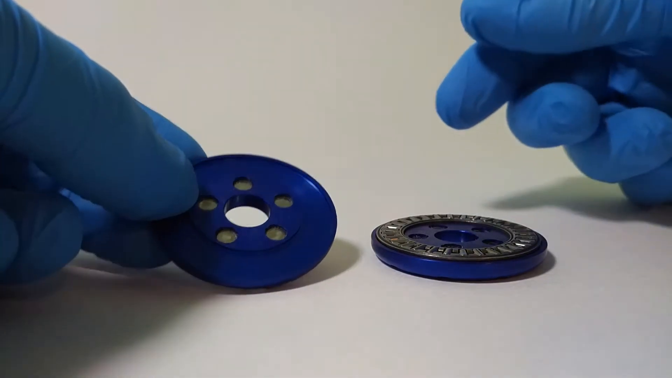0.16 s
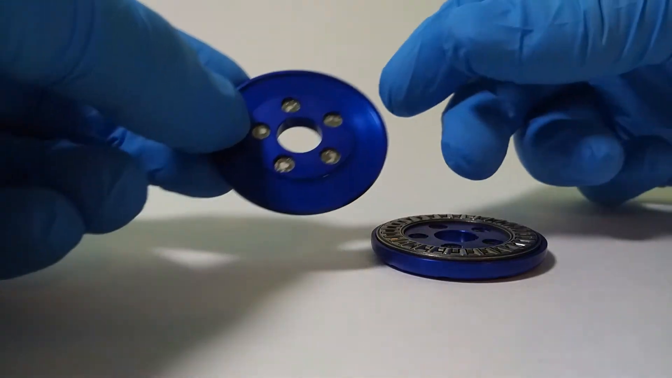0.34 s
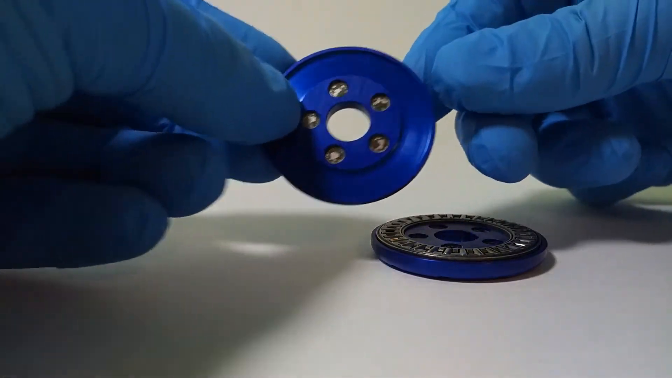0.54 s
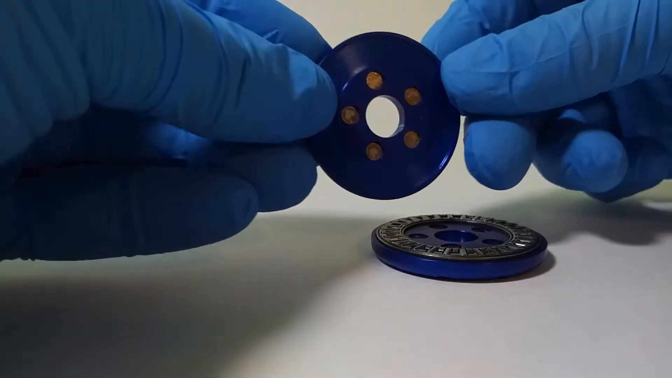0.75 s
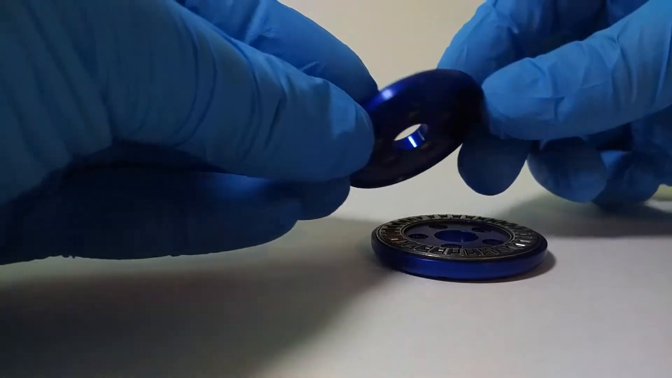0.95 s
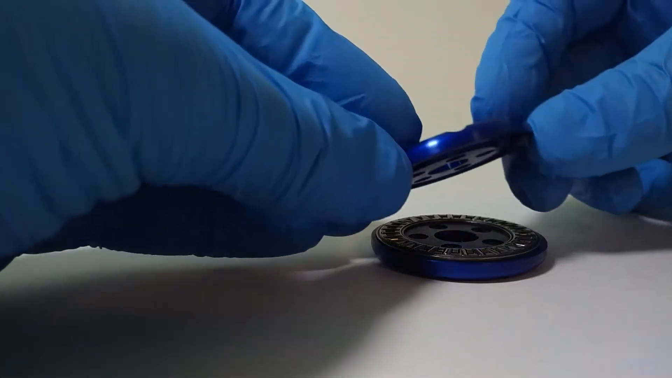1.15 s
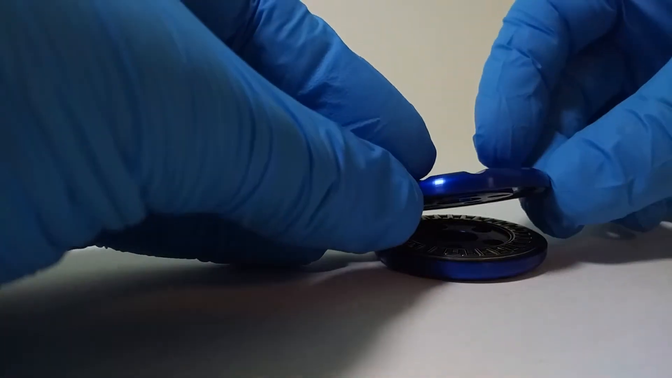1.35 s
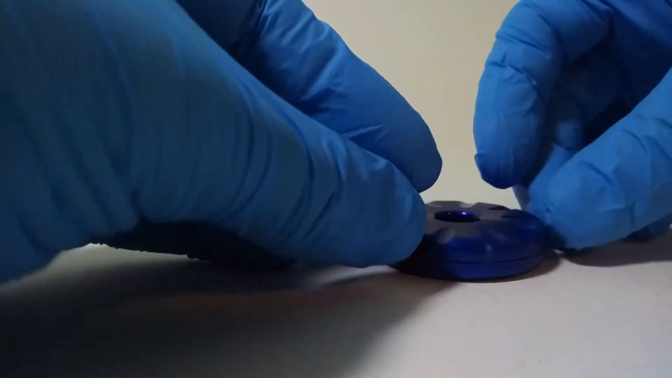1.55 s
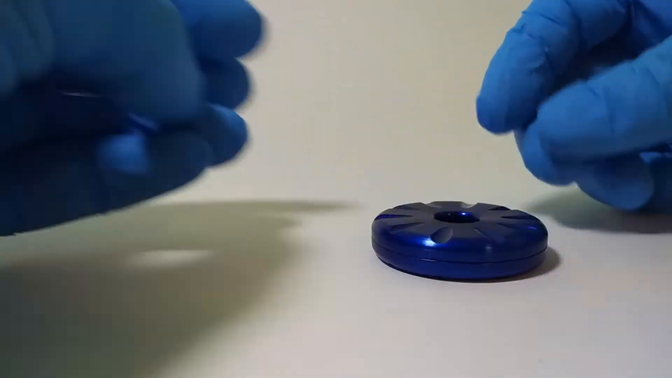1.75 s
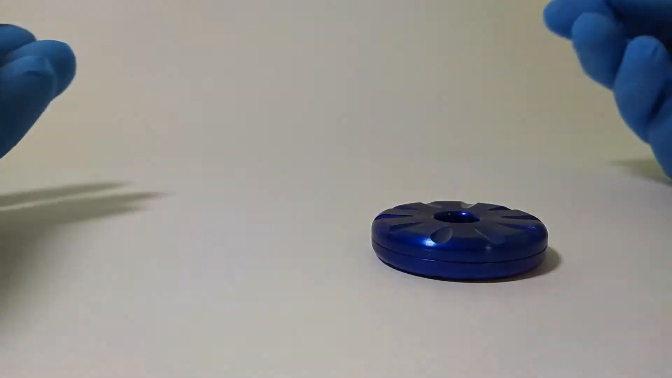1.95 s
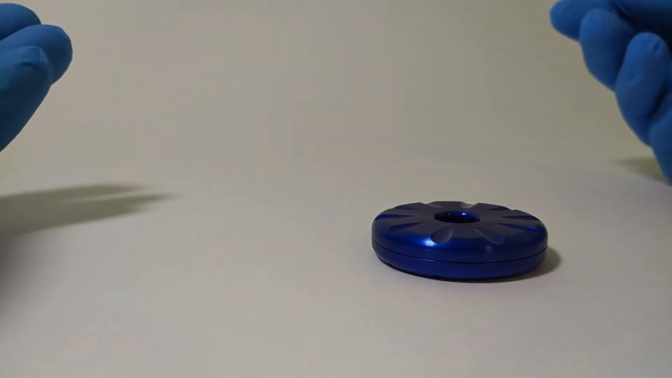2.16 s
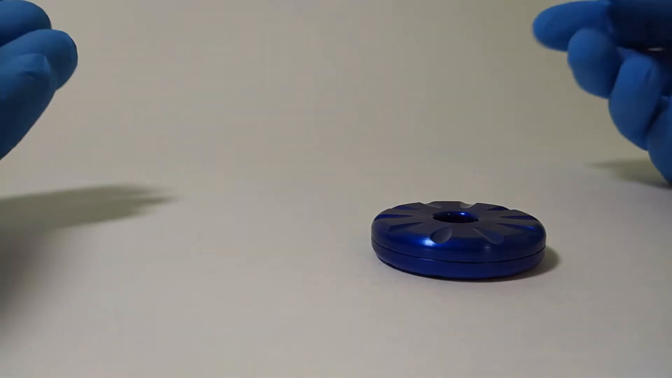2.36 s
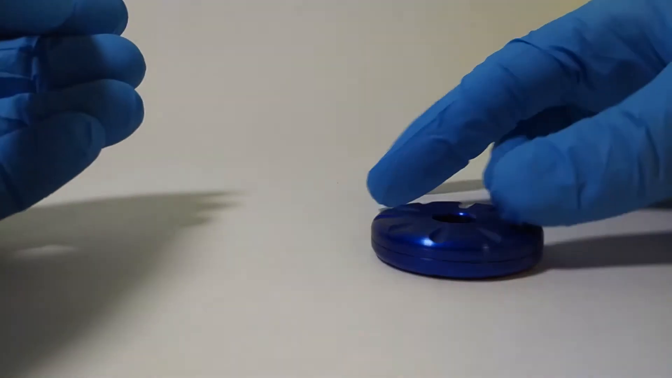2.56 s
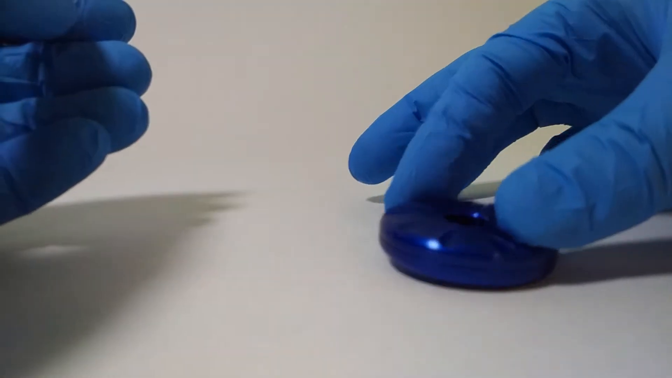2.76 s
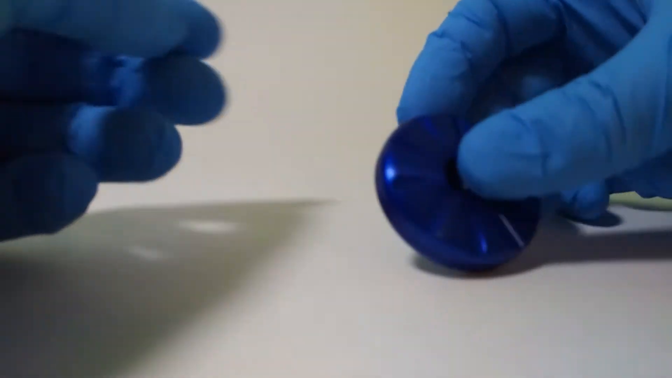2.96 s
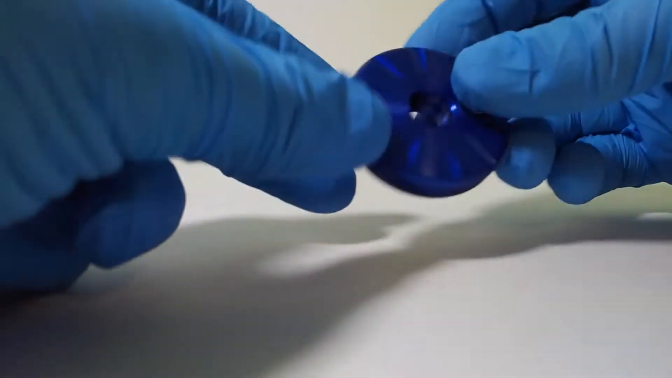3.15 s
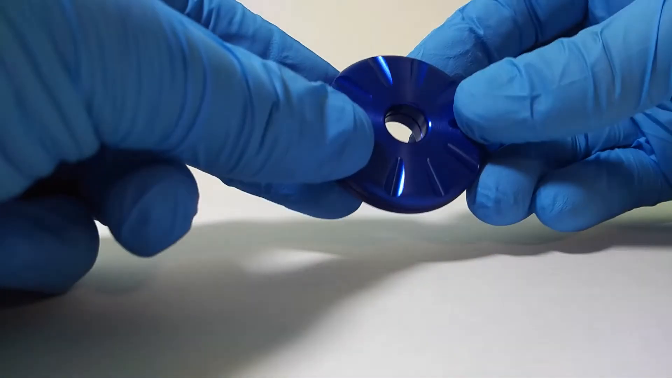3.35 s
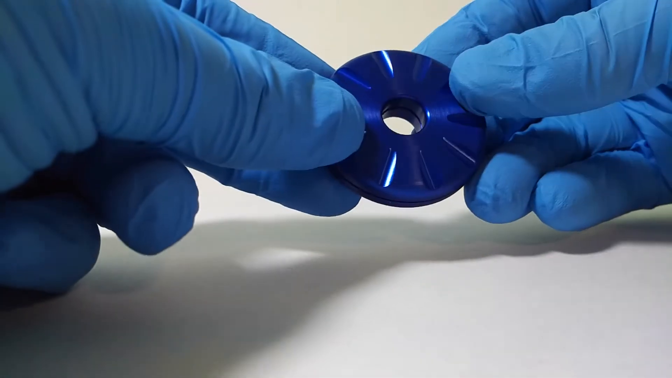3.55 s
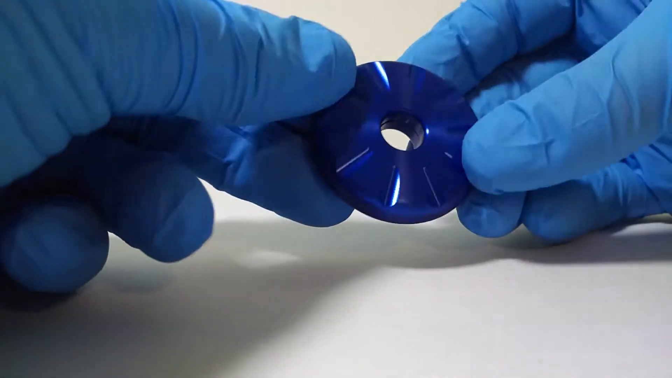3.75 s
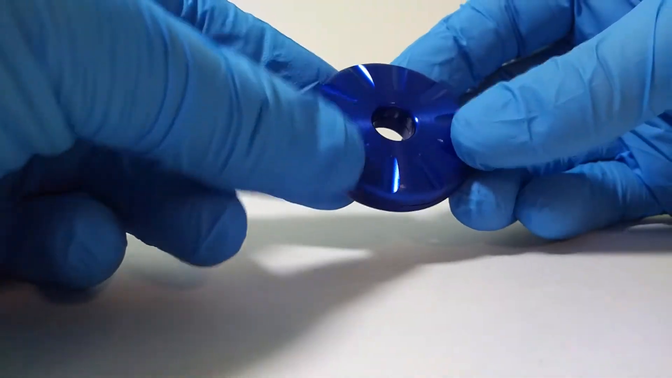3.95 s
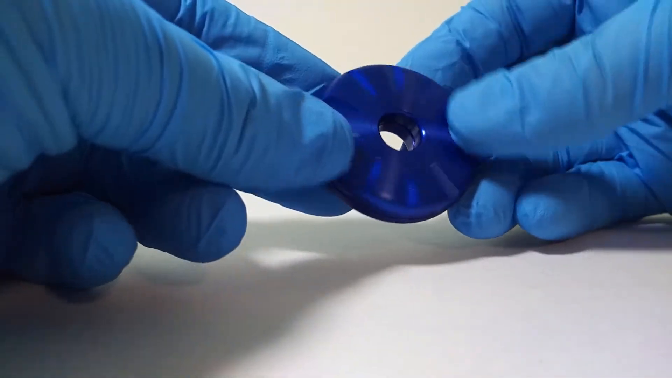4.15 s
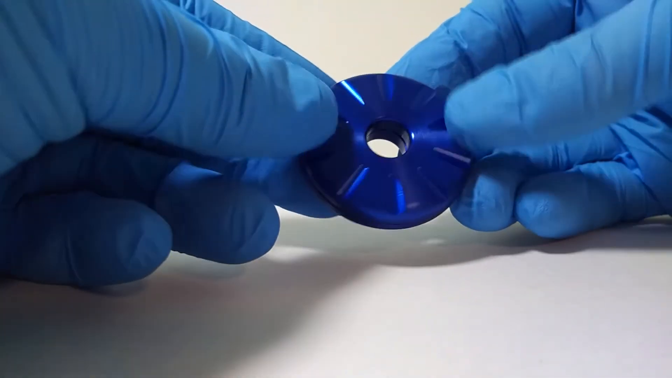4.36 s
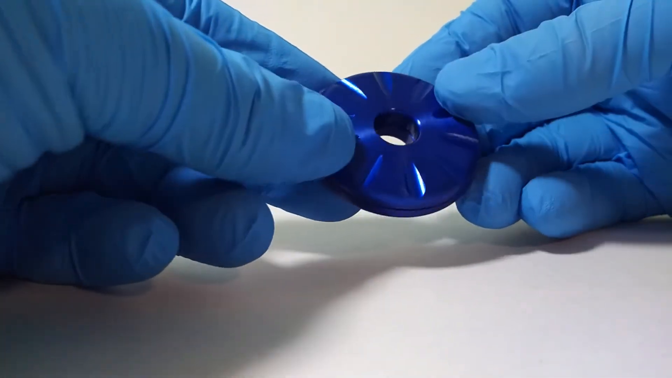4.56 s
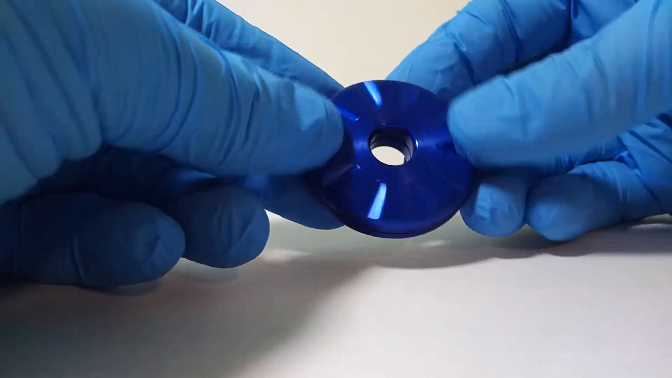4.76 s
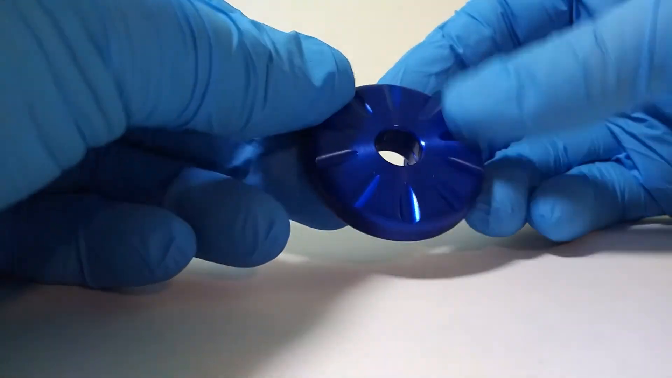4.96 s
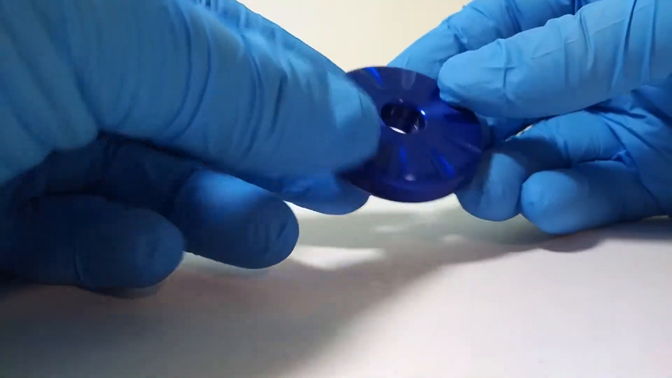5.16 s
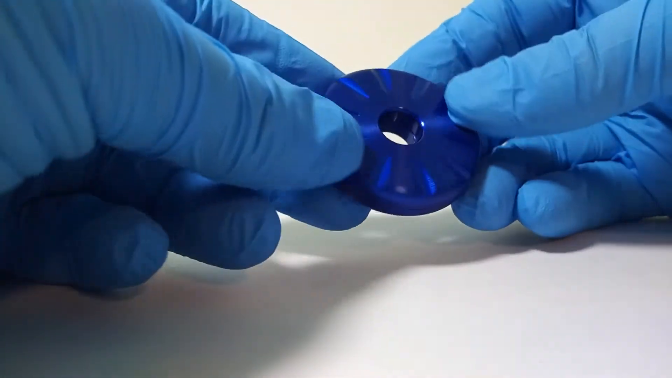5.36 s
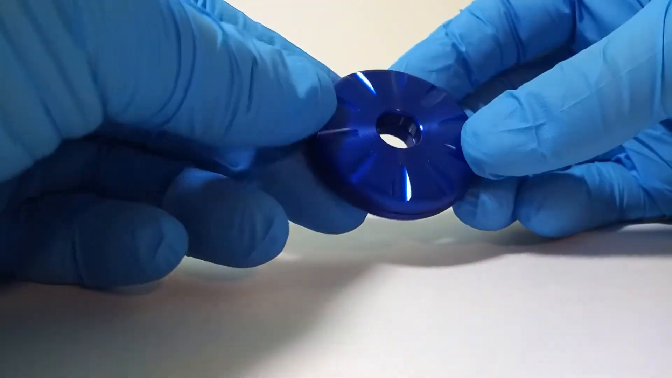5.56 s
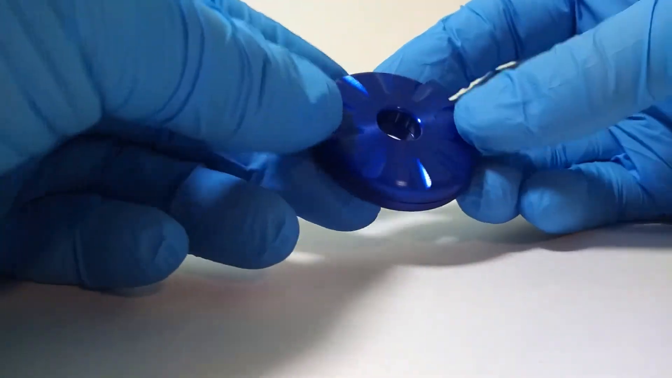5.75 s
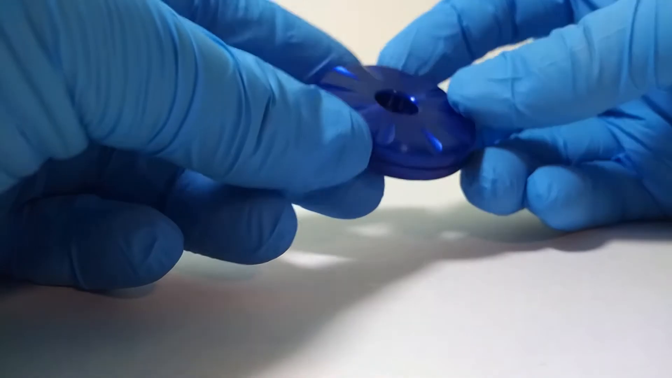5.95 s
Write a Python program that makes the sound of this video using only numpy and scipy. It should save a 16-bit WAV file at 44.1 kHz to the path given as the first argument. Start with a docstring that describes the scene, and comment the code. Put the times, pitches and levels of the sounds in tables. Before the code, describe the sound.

Everything happens close to the microphone in a small, live room with a faint hiss. For the first second and a half, rubber gloves rustle quietly, with light scuffs and small ticks as a metal shell is lifted. At about 1.6 seconds, the two magnetic shells of a fidget toy snap together: a sharp crack with a very quick chatter, a short bright ring and a thud from the wooden desk. This is by far the loudest sound, and it echoes briefly. From 2.5 to 3.3 seconds come soft glove rubs, taps, low bumps and a hollow scuff as the toy is dragged off the desk. Four twists follow at about 3.8, 4.3, 4.9 and 5.5 seconds, each a quick scrape rushing into a crisp metallic clack with a slight low jolt; the third is strongest. Faint sliding and fingertip ticks fill the gaps, ending around 6 seconds.

```python
"""Rubber gloves rustle and scuff over a desk, pick up one metal shell of a magnetic fidget toy
and let it snap onto its twin: a crack, a short metallic ring and a thud from the wood.
The toy is dragged off the desk and twisted four times: the shells scrape, clack into the next
magnet notch and jolt the desk. A small live room, heard from close by through two microphone
ports, the left one ringing in the treble."""
import sys
import numpy as np
from scipy import signal
from scipy.fft import rfft, irfft
from scipy.io import wavfile

SR = 44100
rng = np.random.default_rng(int(sys.argv[2]) if len(sys.argv) > 2 else 0)


def wav_record(signal):
    """Record a signal, one row per channel, as 16-bit PCM in the file named by sys.argv[1]."""
    frames = np.transpose(np.atleast_2d(signal))
    bounded = np.clip(frames, -1, 1)
    # unit amplitude maps onto the largest positive 16-bit level
    quanta = np.round(bounded * 32767).astype(np.int16)
    wavfile.write(sys.argv[1], SR, quanta)


N = 264908
TIME = np.arange(N) / SR

# Twists from notch to notch; levels are relative. Each row: hardest clack in seconds, scrape in dB,
# run-up in seconds, clack in dB, gap between clacks in seconds, note of the gripped shell in Hz,
# then ring, knock, creep and jolt in dB.
TWISTS = [(3.803, -25.5, 0.0083, -20, 0.0034, 5090, -4.5, -17, -46.5, -39),
          (4.2894, -29, 0.014, -21, 0.0021, 5450, -3, -19, -49.5, -32.5),
          (4.901, -21, 0.0085, -13, 0.00377, 4510, -6, -6, -44.5, -37.5),
          (5.5417, -25, 0.0098, -18.5, 0.00503, 4500, -18.5, -5, -50, -36.5)]
# Tone of metal sliding on metal. Each row: frequency in Hz, relative level in dB.
METAL_SPECTRUM = [(100, -14), (900, -29.5), (1500, -10), (2100, -17), (3200, -13.5), (4300, -4),
                  (5600, 1.5), (6600, 0.5), (8000, -11), (10500, -17.5), (13500, -16), (16000, -53)]
# Tone of rubbing gloves. Each row: frequency in Hz, relative level in dB.
RUBBER_SPECTRUM = [(100, -3), (900, -7), (1800, -0.5), (3000, -1), (4500, 1.5), (7000, 0.5), (10000, -4),
                   (15000, -8)]


def amp(db):
    """Decibels to gain."""
    return 10 ** (np.asarray(db) / 20)


def pan(left_minus_right_db):
    """Gains of the left and right port."""
    return amp([[left_minus_right_db / 2], [-left_minus_right_db / 2]])


def at_hz(points, hz):
    """Read (Hz, value) points on a log-frequency axis."""
    point_hz, values = np.transpose(points)
    return np.interp(np.log(np.maximum(hz, 1)), np.log(point_hz), values)


def add(track, start_s, sound):
    """Mix a sound into a track."""
    i = int(start_s * SR)
    track[..., i:i + sound.shape[-1]] += sound[..., :N - i]


def convolve(x, response):
    """Pass a sound through an impulse response."""
    return signal.fftconvolve(np.atleast_2d(x), np.atleast_2d(response), axes=-1)[:, :N]


def colour(x, spectrum, size=4096):
    """Minimum-phase filter with the given spectrum; white noise keeps its power."""
    gains = amp(at_hz(spectrum, np.fft.rfftfreq(size, 1 / SR)))
    cepstrum = irfft(np.log(gains))
    cepstrum[1:size // 2] *= 2
    cepstrum[size // 2 + 1:] = 0
    response = irfft(np.exp(rfft(cepstrum)))
    return convolve(x, response / np.linalg.norm(response))


def resonate(x, hz, width_hz):
    """One resonance, gain 1 at its centre."""
    return signal.lfilter(*signal.iirpeak(hz, hz / width_hz, fs=SR), x)


def fade(t, t60):
    """Exponential decay, 60 dB down after t60 seconds."""
    return np.exp(-np.log(1000) * t / t60)


def surge(t, rise_s, fall_s):
    """Exponential growth up to t = 0, exponential decay after it."""
    return np.exp(np.minimum(t / rise_s, -t / fall_s))


def stroke(crest_s, db, length_s, shape=1.2):
    """Speed of a slide that swells and dies away; shape 1 is pointed, 2 is round."""
    return amp(db) * np.exp(-np.abs(2 * (TIME - crest_s) / length_s) ** shape)


def diffuse(size):
    """Stereo noise from all sides: alike at both ports in the bass, unrelated in the treble."""
    mid, side = rfft(rng.standard_normal((2, size)))
    alike = .75 / (1 + (np.fft.rfftfreq(size, 1 / SR) / 700) ** 4)
    mid = mid * np.sqrt((1 + alike) / 2)
    side = side * np.sqrt((1 - alike) / 2)
    return irfft(np.array([mid + side, mid - side]), size)


def burst(t60, size=8192):
    """The short noisy crack of one contact, scattered to both ports."""
    return diffuse(size) * fade(TIME[:size], t60)


def grit(spread_db, slip_samples=24):
    """Friction: dense micro-slips of unequal size, scattered to both ports; rms 1."""
    noise = diffuse(N)
    slip_db = spread_db * rng.standard_normal(N // slip_samples + 1)
    slips = noise * amp(np.repeat(slip_db, slip_samples)[:N])
    return slips / slips.std()


def catches(spread_db, every_s):
    """Uneven gain of a surface that catches and lets go."""
    times = np.arange(0, TIME[-1], every_s)
    grip = rng.standard_normal(N // 100)[:len(times)]
    return amp(spread_db * np.interp(TIME, times, grip))


def background(air_db=-60):
    """Low room rumble, hiss, a faint hum and a thin electrical whine."""
    # Room tone. Each row: frequency in Hz, relative level in dB.
    air_spectrum = [(20, -97.5), (55, -84), (90, -85), (160, -92), (400, -99), (650, -95), (820, -100),
                    (1400, -99), (2500, -104), (6000, -106), (15500, -104)]
    # Hum and whine. Each row: frequency in Hz, level in dB.
    tones = [(720, -73), (12349, -77), (13038, -71)]
    whine = sum(amp(db) * np.sin(2 * np.pi * hz * TIME) for hz, db in tones)
    return amp(air_db) * colour(diffuse(N), air_spectrum) + whine


def gloves(gain_db=6):
    """Crinkling rubber brushes rubber and metal, now nearer one port, now the other."""
    # Glove strokes. Each row: crest in seconds, relative level in dB, length in seconds,
    # left minus right in dB.
    rubs = [(0.01, -67, 0.054, -4), (0.2, -65.5, 0.22, 0), (0.369, -50.5, 0.074, 4.5),
            (0.654, -56.5, 0.094, 4), (.78, -65.5, 0.048, 0), (0.883, -64.5, .09, 3.5),
            (1.163, -66.5, 0.51, 0.5), (1.952, -55.5, 0.19, -1.5), (2.482, -50, 0.054, 4.5),
            (2.612, -54, 0.19, -1.5), (2.837, -52, 0.047, -2.5), (3.016, -49.5, 0.13, 2),
            (3.25, -60.5, 0.09, 1)]
    speed = sum(stroke(s, db, length_s) * pan(pan_db) for s, db, length_s, pan_db in rubs)
    crinkle = catches(spread_db=1.5, every_s=.005)
    return amp(gain_db) * colour(speed * crinkle * grit(spread_db=1.5), RUBBER_SPECTRUM)


def desk_scuffs(gain_db=-2):
    """The toy's rim or a hand stutters over the desk top, which answers with a hollow scuff."""
    # Drags over the desk. Each row: crest in seconds, relative level in dB, length in seconds.
    drags = [(0.01, -51, 0.076), (.205, -48, 0.058), (1.529, -45, 0.028), (1.636, -34, 0.054),
             (2.612, -54.5, 0.19), (2.87, -48.5, 0.14), (3.006, -33, .08), (5.986, -59.5, 0.66)]
    # Tone of the scuff. Each row: frequency in Hz, relative level in dB.
    scuff_spectrum = [(40, -15.5), (110, -0.5), (200, -3.5), (320, -6), (460, -3.5), (630, -5), (820, -14),
                      (1100, -11.5), (1600, -18), (3000, -22), (8000, -44)]
    # Hollow notes of the desk top. Each row: frequency in Hz, width in Hz, gain in dB.
    hollow_notes = [(377, 19, -9.5), (483, 24, 2), (630, 55, -6.5)]
    speed = sum(stroke(*row) for row in drags)
    stutter = catches(spread_db=2.5, every_s=.012)
    scuff = colour(speed * stutter * diffuse(N), scuff_spectrum)
    hollow = sum(amp(db) * resonate(scuff, hz, width) for hz, width, db in hollow_notes)
    return amp(gain_db) * (scuff + hollow)


def ticks(gain_db=3):
    """Fingertips and rims make damped little contacts, each with one broad resonance."""
    # Light touches. Each row: start in seconds, relative peak level in dB, centre in Hz.
    touches = [(0.54, -48, 5800), (0.707, -45, 5500), (0.848, -52, 5100), (1.147, -41, 1540),
               (1.169, -41, 1270), (1.274, -51.5, 1770), (2.508, -35, 920), (2.596, -34, 2340),
               (3.293, -39, 5430), (4.013, -45, 2470), (4.243, -46, 1123), (4.588, -47.5, 5980),
               (4.78, -45.5, 5280), (4.841, -41, 5930), (5.176, -45, 5950), (5.197, -41.5, 5900),
               (5.268, -46, 990), (5.765, -59, 5800)]
    out = np.zeros((2, N))
    for s, db, hz in touches:
        width_hz = 1700 + .34 * hz
        tick = resonate(resonate(burst(t60=.016), hz, width_hz), hz, width_hz)
        add(out, s, amp(db + gain_db) * tick / np.abs(tick).max())
    return out


def snap(thud_db=-12, desk_db=-3):
    """Each blow cracks, rings the shells and pushes the desk; returns the metal and the wood."""
    # The shells touch twice, slam together and chatter on the desk. Each row: start in seconds,
    # then relative levels in dB of the crack, the shells' ring and the push on the desk.
    blows = [(1.5135, -43, -19.5, -32.5), (1.5475, -41, -31.5, -25.5), (1.6276, -2.5, -4.5, -20.5),
             (1.6329, -6, -2, 0), (1.6347, -8.5, -7, -6), (1.6383, -3.5, 6.5, -5.5),
             (1.6428, -13, -8.5, -2), (1.6459, -10, -14.5, 1), (1.6497, -2.5, -9, -4.5),
             (1.663, -44, -61, -1.5), (1.675, -25.5, -15, -0.5)]
    # Broad, short resonances: pressed together by the magnets, the shells damp each other.
    # Each row: frequency in Hz, width in Hz, gain in dB.
    shell_modes = [(4900, 900, 0), (5690, 1300, 1), (10980, 1400, 5.5)]
    # Ring of the whole desk top. Each row: frequency in Hz, relative level in dB, t60 in seconds.
    desk_modes = [(60.8, -32.5, 0.44), (89.3, -33, .8), (113, -32.5, 0.51), (163.4, -33, 0.77),
                  (203.8, -14, 0.16), (244.3, -32.5, 0.3), (273.3, -35, 0.23), (333, -31.5, 0.11),
                  (498, -44, 1), (615, -30, 0.33), (915, -29, 0.29), (1270, -34, 0.085), (1452, -28, 0.28),
                  (1685, -37.5, 0.34)]
    # Tones of the metal crack and the wooden thud. Each row: frequency in Hz, relative level in dB.
    crack_spectrum = [(100, 1), (600, 5), (1500, 11.5), (2100, 1), (3200, 4.5), (5000, -2), (7000, 0.5),
                      (9000, -4), (12000, -6), (16000, -17)]
    thud_spectrum = [(25, -29), (50, 7), (110, -5), (250, 0), (400, -5), (620, -4), (780, -8.5),
                     (1000, -11.5), (1500, -11.5), (2300, -14), (4000, -21), (10000, -50.5)]
    cracks, contacts, thuds = np.zeros((3, 2, N))
    pushes = np.zeros(N)
    for s, crack_db, ring_db, push_db in blows:
        add(cracks, s, amp(crack_db) * burst(t60=.013))
        add(contacts, s, amp(ring_db) * burst(t60=.0076))
        add(thuds, s, amp(push_db) * burst(t60=.05))
        add(pushes, s, amp([push_db]))
    shell_ring = sum(amp(db) * resonate(resonate(contacts, hz, width), hz, width)
                     for hz, width, db in shell_modes)
    t = TIME[:SR]
    desk_ring = sum(amp(db) * np.sin(2 * np.pi * hz * t) * fade(t, t60) for hz, db, t60 in desk_modes)
    metal = .5 * colour(cracks, crack_spectrum) + shell_ring
    wood = amp(thud_db) * colour(thuds, thud_spectrum) + amp(desk_db) * convolve(pushes, desk_ring)
    return metal, wood


def desk_jolts(gain_db=-1, stiffen=.49, relax_s=.004):
    """Soft pushes make the desk swing for a few cycles, faster while the hand still presses."""
    # Hands bump the desk. Each row: start in seconds, relative level in dB, settled pitch in Hz,
    # time to the crest in seconds.
    bumps = [(2.58, -40, 62, 0.028), (2.735, -36, 57, 0.013), (2.842, -39, 62.4, 0.011),
             (3.016, -33, 52, 0.021), (3.024, -31.5, 201, 0.016), (3.221, -50.5, 57.6, 0.069),
             (4.059, -47.5, 59, 0.03)]
    # The jerk of each twist reaches the desk through the hands, a moment later.
    jerks = [(s + .0035, db, 61.6, .017) for s, *_, db in TWISTS]
    out, t = np.zeros(N), TIME[:SR // 2]
    for s, db, hz, crest_s in bumps + jerks:
        swell = (t / crest_s * np.exp(1 - t / crest_s)) ** 2
        pitch_hz = hz * (1 + stiffen * np.exp(-t / relax_s))
        cycles = np.cumsum(pitch_hz) / SR
        add(out, s, amp(db + gain_db) * swell * np.sin(2 * np.pi * cycles))
    return out


def creep(metal_db=-5, rubber_db=-10):
    """Metal and rubber slide faintly around each twist and with each new grip."""
    # The shells shift in the fingers. Each row: crest in seconds, relative level in dB,
    # length in seconds.
    regrips = [(4.007, -51, 0.052), (4.085, -43.5, 0.023), (4.156, -54, 0.01), (4.504, -55.5, .08),
               (5.238, -50, 0.042), (5.831, -45.5, 0.096)]
    speed = sum(stroke(*row) for row in regrips)
    speed += sum(amp(db) * surge(TIME - s, rise_s=.068, fall_s=.12) for s, *_, db, _ in TWISTS)
    metal = colour(speed * grit(spread_db=3), METAL_SPECTRUM)
    rubber = colour(speed * grit(spread_db=3), RUBBER_SPECTRUM)
    return amp(metal_db) * metal + amp(rubber_db) * rubber


def rattle(t, gap_s, slip_s=.00018, step_db=9.5):
    """Five very short slips grow towards the hardest at t = 0, then rebound ever more weakly."""
    envelope = 0
    for k in range(-2, 3):
        distance = np.minimum(np.abs(t - k * gap_s) / slip_s, 10)
        envelope += amp(-step_db * abs(k)) * np.exp(-.5 * distance ** 2)
    return envelope


def twists(overshoot_s=.0018, clack_gain_db=4, ring_gain_db=10, cavity_hz=1780):
    """The magnets speed a scrape up into hard clacks; the grip sets the note the shell rings with."""
    friction = grit(spread_db=3)
    out = 0
    for s, scrape_db, rise_s, clack_db, gap_s, ring_hz, ring_db, knock_db, _, _ in TWISTS:
        scrape = amp(scrape_db) * surge(TIME - s - overshoot_s, rise_s, fall_s=.0059)
        clacks = amp(clack_db + clack_gain_db) * rattle(TIME - s, gap_s)
        force = (scrape + clacks) * friction + 1e-18  # the offset keeps the filters from underflowing
        ring = amp(ring_db + ring_gain_db) * resonate(force, ring_hz, width_hz=260)
        knock = amp(knock_db) * resonate(force, cavity_hz, width_hz=210)  # hollow between the shells
        out += force + ring + knock
    return colour(out, METAL_SPECTRUM)


def room_response(build_s=.01, size=40960):
    """Diffuse room tail of unit energy per port, each band dying at its own rate."""
    # Decay of the room. Each row: frequency in Hz, t60 in seconds.
    decay_times = [(60, 1), (200, 0.57), (700, 0.71), (2500, 0.68), (6000, 0.39), (8500, 0.57),
                   (11000, 0.37), (15000, 0.54)]
    t, hz = TIME[:size], np.fft.rfftfreq(size, 1 / SR)
    noise = rfft(diffuse(size))
    edges_hz = np.geomspace(30, SR / 2, 15)
    tail = 0
    for low, high in zip(edges_hz, edges_hz[1:]):
        band = irfft(noise * (hz >= low) * (hz < high))
        tail += band * fade(t, at_hz(decay_times, np.sqrt(low * high)))
    tail *= 1 - np.exp(-t / build_s)
    return tail / np.sqrt(np.sum(tail ** 2) / 2)


def delay_right(x, lag_samples=7):
    """A small source very near the ports reaches the right one a moment later."""
    return np.array([x[0], np.roll(x[1], lag_samples)])


def in_room(x, room, pan_db, room_db):
    """Direct sound at the two ports, with its room tail."""
    return x * pan(pan_db) + amp(room_db) * convolve(x, room)


def scene():
    """Everything happens just in front of the microphones; the room answers the slam and the light ticks most."""
    room = room_response()
    metal, wood = snap()
    return (in_room(metal, room, pan_db=1.5, room_db=-5)
            + in_room(wood, room, pan_db=0, room_db=-10)
            + in_room(delay_right(twists()), room, pan_db=2.5, room_db=-17.5)
            + in_room(creep(), room, pan_db=-3.5, room_db=-28)
            + in_room(gloves(), room, pan_db=0, room_db=-9)
            + in_room(desk_scuffs(), room, pan_db=0, room_db=-8.5)
            + in_room(desk_jolts(), room, pan_db=3.5, room_db=-9)
            + in_room(ticks(), room, pan_db=0, room_db=-4.5)
            + background())


def record(dry, port_db=10, ceiling=.88, low_cut_hz=36, high_cut_hz=15900):
    """The left port resonates, the loudest peaks are rounded, the deep bass and the top are cut."""
    # The short sound channel in front of the left capsule rings like a tiny pipe.
    left = dry[0] + amp(port_db) * resonate(dry[0], hz=6020, width_hz=1000)
    rounded = ceiling * np.tanh(np.array([left, dry[1]]) / ceiling)
    low_cut = signal.butter(4, low_cut_hz, "high", fs=SR, output="sos")
    high_cut = signal.ellip(10, .1, 50, high_cut_hz, fs=SR, output="sos")
    return signal.sosfiltfilt(high_cut, signal.sosfilt(low_cut, rounded))


dry = scene()
out = record(dry)
wav_record(out)
```